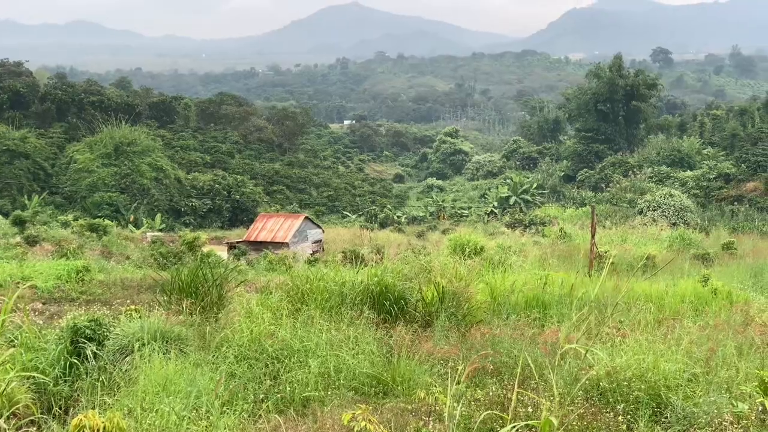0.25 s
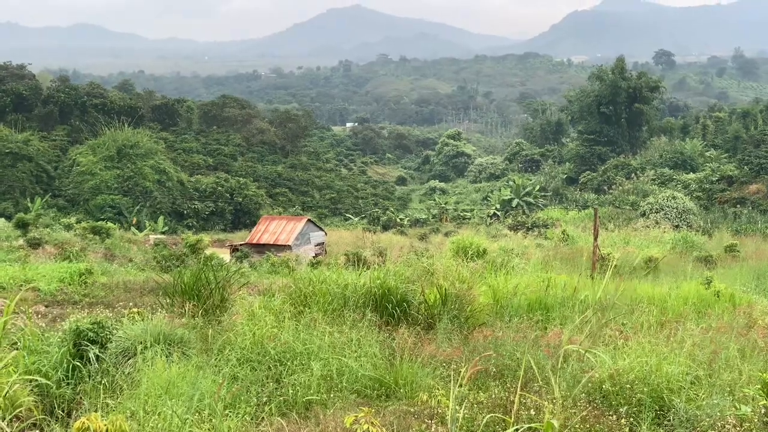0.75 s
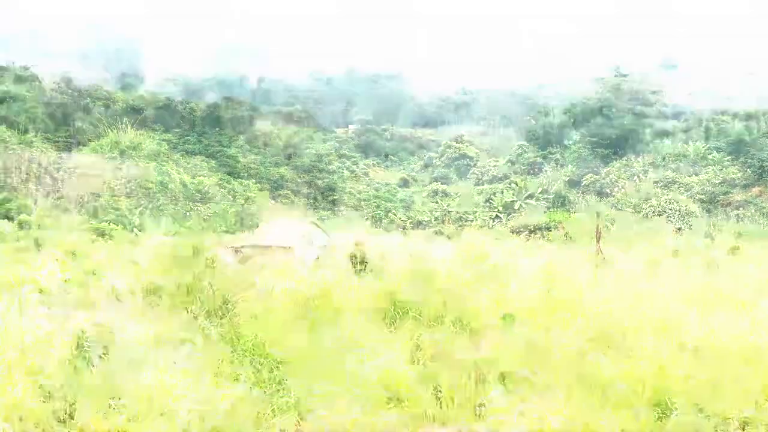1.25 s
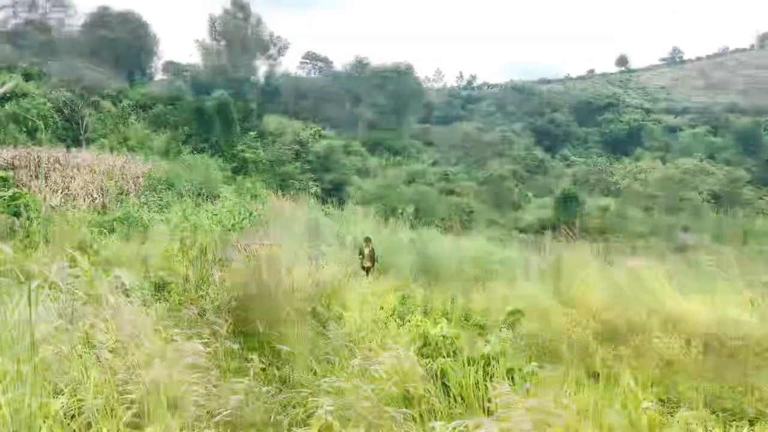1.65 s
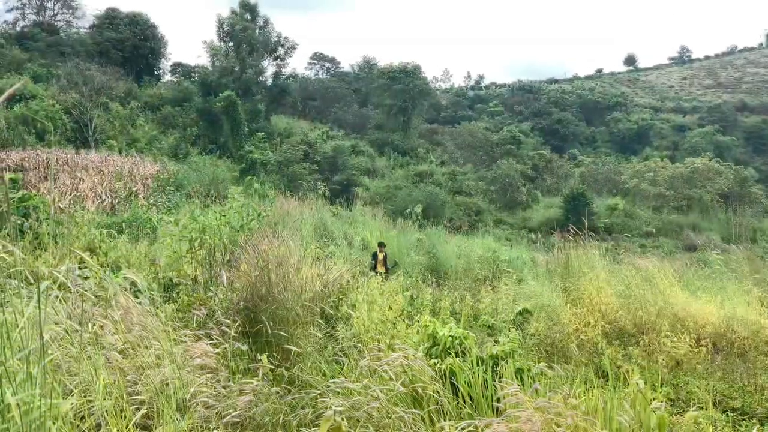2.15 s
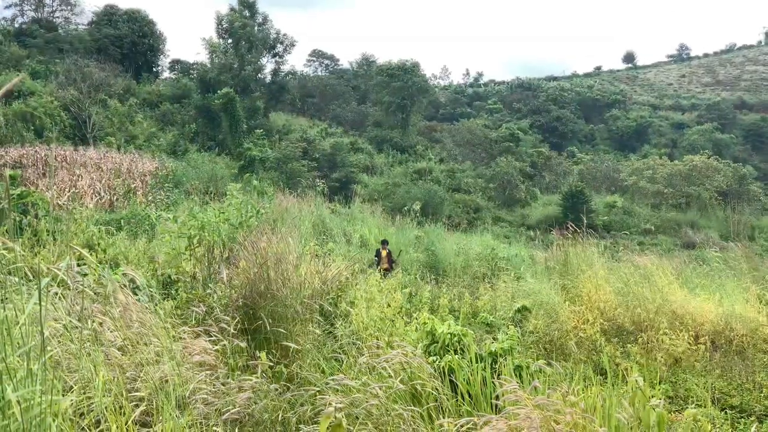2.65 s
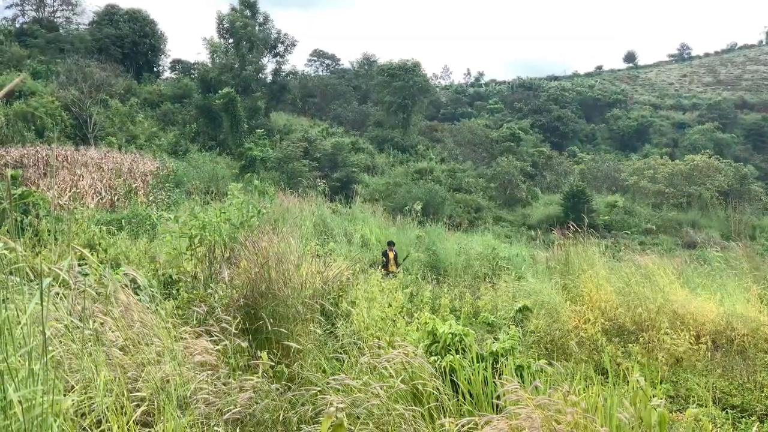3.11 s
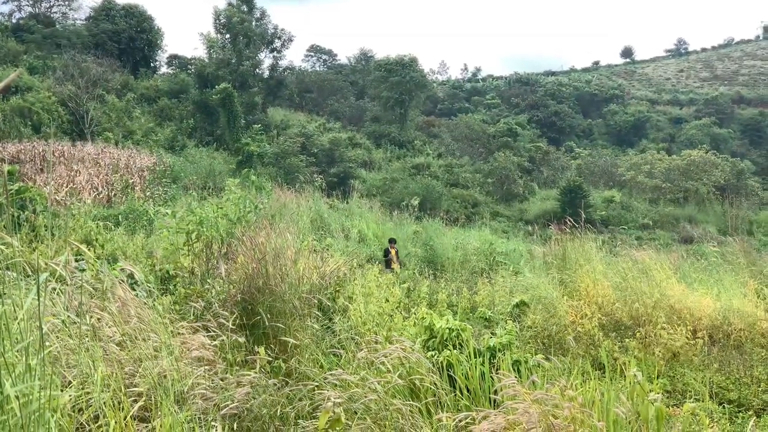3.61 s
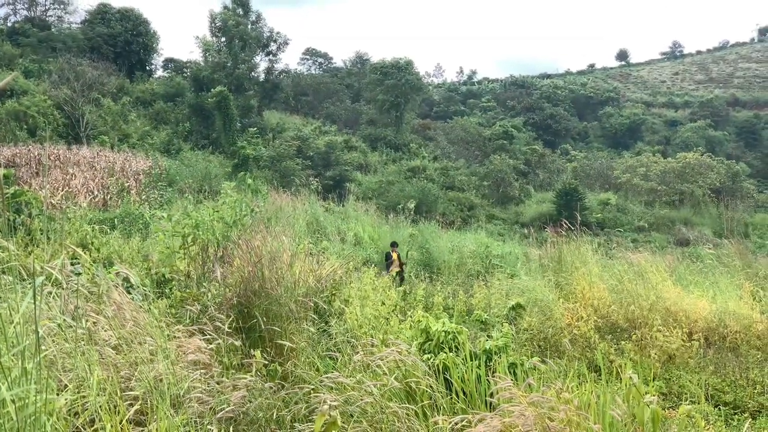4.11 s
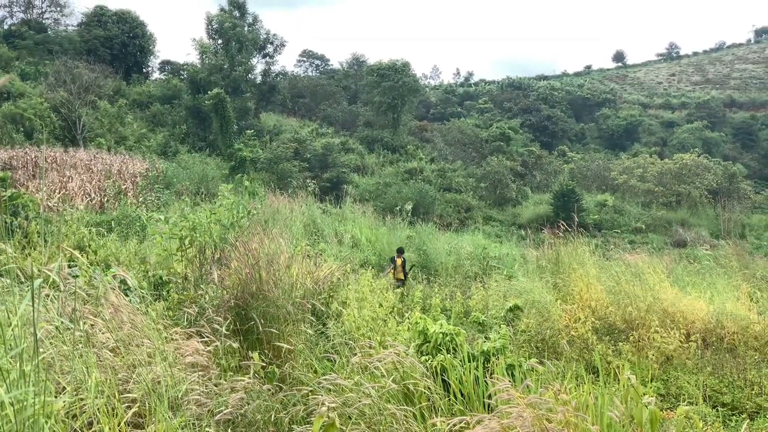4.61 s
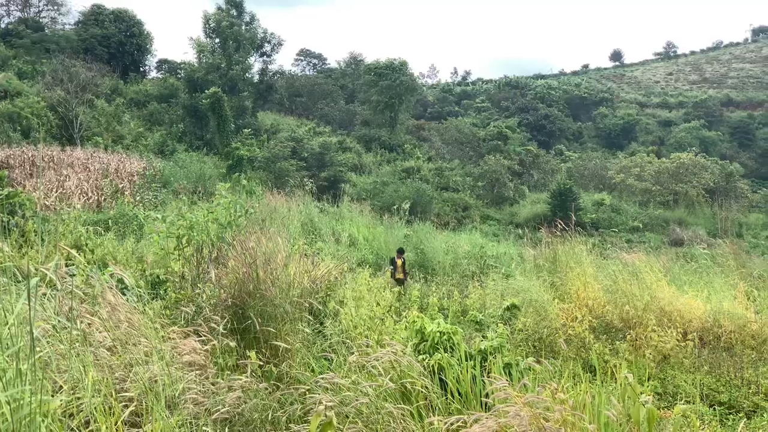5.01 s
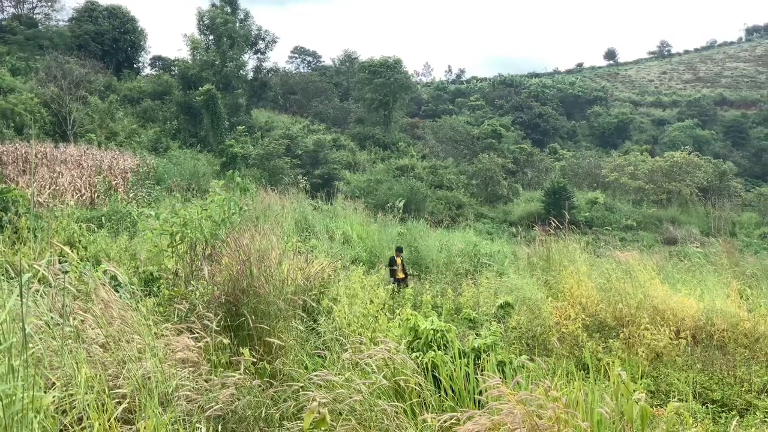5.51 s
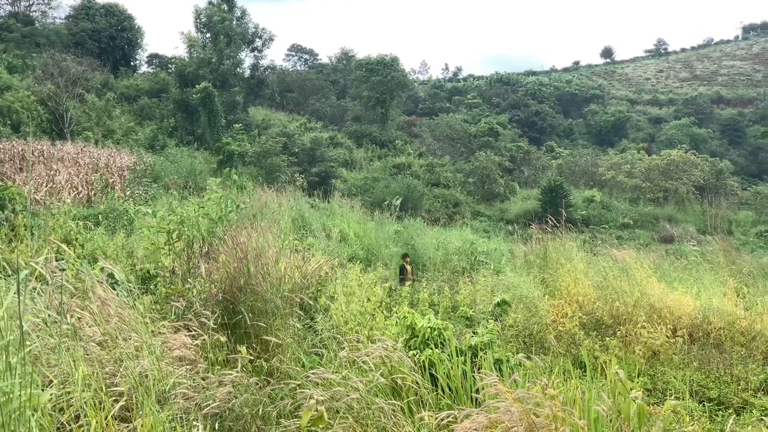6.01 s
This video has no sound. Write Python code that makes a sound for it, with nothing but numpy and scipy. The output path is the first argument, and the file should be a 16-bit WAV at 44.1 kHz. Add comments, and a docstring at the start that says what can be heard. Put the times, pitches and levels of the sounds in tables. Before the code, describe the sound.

A bright, narrow insect ringing near 6 kHz runs from start to end, with a thin bush-cricket sizzle higher up. From 0 to 1.8 s it is buzzier, over soft air and a slow one-cylinder engine chugging far away, with dull rapid thumps and a low hum. At 0.8 s a second ambience joins: smoother chorus, a low wavering motor drone that swells and sinks, and crickets chirping in pairs over four times a second amid faint trills. Far birds drop short blurred notes at 1.0-1.9 s. From 2.1 to 2.65 s a bird gives four rising, increasingly raspy notes, then six quick upward flicks fading by 3.4 s. A low rush swells near 3.3 s. Dry grass ticks sporadically, clearest around 4.3 s. A thin whistle rises at 5.4 s; faint bird notes patter from 5.8 s to the end at about 6.3 s.

```python
"""Open grassland from two listening spots

A chorus of insects rings near 6 kHz throughout: pulsed wing noise in a narrow band. Bush-crickets sizzle above it.
At the first spot a slow one-cylinder engine chugs far off: regular blows on damped resonances.
At the second, which overlaps it for a second, a distant motor drones as a wavering tone and crickets chirp and trill.
A bird gives one run of rising many-stranded notes, far birds call in gliding tones, and dry grass ticks in noise bursts.
"""
import sys
import numpy as np
from scipy import signal
from scipy.fft import rfft, irfft, next_fast_len
from scipy.io import wavfile
from scipy.ndimage import uniform_filter1d

SR = 44100
rng = np.random.default_rng(int(sys.argv[2]) if len(sys.argv) > 2 else 0)


def transcribe(signal):
    """Save signal, clipped to [-1, 1], as a 16-bit WAV file at the path in sys.argv[1]."""
    frames = np.atleast_2d(signal).T
    limited = np.clip(frames, -1, 1)
    pcm = np.round(limited * 32767).astype(np.int16)
    wavfile.write(sys.argv[1], SR, pcm)


N = 276066
TIME = np.arange(N) / SR
FFT_SIZE = next_fast_len(N, real=True)
BIN_HZ = np.maximum(np.arange(FFT_SIZE // 2 + 1) * SR / FFT_SIZE, 1e-3)  # above 0 so that its log exists

# Spectral outlines give relative density; the sounds shaped by them are scaled to rms 1 before they are mixed.
# wing resonance of the chorus at each spot: frequency_hz, density_db_per_hz
FIRST_SONG = [(5100, -29), (5600, -8.5), (5950, -1.5), (6100, -9), (6210, 5.5), (6400, -12), (6750, -21),
              (7100, -24.5)]
SECOND_SONG = [(5200, -42), (5700, -11), (5950, -2.5), (6080, -0.5), (6190, 5), (6330, -1), (6550, -8),
               (7050, -10.5), (7550, -27.5), (8100, -15.5), (9000, -66)]
# wing rasp of the bush-crickets: frequency_hz, density_db_per_hz
SIZZLE = [(12100, -76), (13000, 10), (14200, 6.5), (15000, 3.5), (15700, 7)]

# level of each cricket before panning: time_s, level_db
CHIRP_LEVEL = [(.8, -72), (2, -70), (4.5, -69), (5.2, -72.5), (6.26, -70.5)]
LOW_TRILL_LEVEL = [(.8, -84), (2, -83), (4, -80.5), (6.26, -80)]
HIGH_TRILL_LEVEL = [(.8, -85), (4.2, -84), (4.8, -87), (6.26, -88)]
# spurts in the trill of the lower cricket: centre_s
SPURTS = [1.22, 1.28, 1.38, 1.67, 1.87, 1.98, 2.73, 2.87, 3.03, 3.12, 3.25, 3.34, 3.45, 3.59, 3.77, 3.83,
          3.94, 4.2, 4.3, 4.4, 4.53, 4.62, 4.76, 4.85, 4.91, 5.02, 5.09, 5.18, 5.27, 5.4, 5.51, 5.86, 5.99,
          6.22]
CHIRPS_PER_S, FIRST_CHIRP_S = 4.577, .932  # each chirp is a pair of syllables
SYLLABLE_GAP_S, SYLLABLE_S = .056, .048
# half length of a spurt; strength of the trill between spurts
SPURT_S, TRILL_BETWEEN = .022, .55

# exhaust resonances of the one-cylinder engine: frequency_hz, decay_s, relative_level_db
EXHAUST_MODES = [(69, .022, -4), (122, .012, -5), (168, .015, 0)]
# resonances of the driven machine, struck by each knock: frequency_hz, decay_s, relative_level_db
CLATTER_MODES = [(264, .012, -6), (292, .012, -2), (319, .013, -1), (346, .012, 0)]
# mean levels of the machine's hum before its fade: harmonic_order, amplitude_db
HUM = [(3, -71), (6, -75), (7, -80), (8, -83), (9, -84)]
# fade of the driven machine: time_s, gain_db
MACHINE_FADE = [(.8, 0), (1.8, -5)]
FIRING_HZ, KNOCK_HZ, FIRST_BLOW_S, HUM_HZ = 13.87, 29.1, .027, 97.2
THUMP_DB, CLATTER_DB = -61.5, -64.5

# pitch of the distant motor, on average: time_s, firing_rate_hz
MOTOR_PITCH = [(.8, 62.33), (3.3, 65.52), (4.2, 67.1), (5, 68.03), (6, 68.77), (6.26, 66.5)]
# drone before flutter and mix: time_s, level_db
MOTOR_LEVEL = [(0.8, -57), (0.83, -42), (1.83, -55), (1.86, -43), (1.94, -72), (2.21, -50), (2.27, -94),
               (2.37, -48), (2.44, -55.5), (3.29, -50.5), (3.34, -41.5), (4.27, -40), (4.86, -52),
               (5.33, -40), (6.05, -40.5), (6.26, -59)]
# flutter at the strongest level (dB), and its growth for every dB that the drone sinks
FLUTTER_DB, FLUTTER_PER_DB = 2.43, 0.2712
# far rush that comes with the motor: frequency_hz, density_db_per_hz
RUSH = [(200, -4), (300, -6.5), (400, 2), (520, 0), (640, -4.5), (760, -13), (1000, -5), (1400, -42)]
# rush before flicker and mix: time_s, level_db
RUSH_LEVEL = [(0.8, -76), (0.83, -72.5), (1.88, -68), (1.89, -75.5), (3.54, -66.5), (3.67, -72),
              (3.77, -65), (4.08, -67), (4.4, -68.5), (4.78, -75.5), (4.98, -68), (5.54, -65.5),
              (5.67, -72), (5.91, -66.5), (6.26, -71.5)]

# drawn-out bird notes, levels before the mix, strands relative to the main one before the throat:
# start_s, length_s, start_hz, rise_hz, time_power, level_db, upper_strand_db, lower_strand_db, lower_voice_db
SLURS = [(2.14, 0.12, 3390, 377, 2.5, -64.5, -6, -17, -17),
         (2.28, 0.11, 3245, 600, 1.06, -62.5, -9, -8, -11),
         (2.421, 0.095, 3040, 1130, 1.1, -61, -1.5, -12, -6),
         (2.565, 0.083, 3035, 2180, 1.07, -60.5, -5, -11, -0.5)]
# short upward flicks, levels before the mix: start_s, length_s, top_hz, level_db
FLICKS = [(2.732, 0.061, 3403, -56), (2.887, 0.042, 3497, -55.5), (3.013, 0.032, 3400, -60),
          (3.123, 0.03, 3285, -62.5), (3.23, 0.029, 3260, -64), (3.337, 0.03, 3140, -66)]
# pitch over that of the main strand: upper_strand_ratio, lower_strand_ratio, lower_voice_ratio
STRAND_RATIOS = (1.16, .87, .59)
# the same strands in a flick, before the throat: upper_strand_db, lower_strand_db, lower_voice_db
FLICK_STRANDS_DB = (-26, -12, -28)
# air through the throat in the drawn-out notes: frequency_hz, density_db_per_hz
BIRD_HISS = [(1800, -8), (2100, -3), (2700, -12), (3300, -2), (4100, 0), (4600, -4), (5200, -6)]
BIRD_HISS_DB = -7.5  # relative to the notes
FLICK_START_HZ, FLICK_CREST = 1700, .8  # a flick arches to its top at this share of its length
SLUR_RASP, FLICK_RASP, WAVER_HZ = 0.95, 0.6, 380  # greatest roughness; pitch waver at roughness 1
THROAT_HZ, THROAT_WIDTH_HZ = 3650, 1800
SLUR_SWELL_DB, FLICK_SWELL_DB = 2, 8  # growth from start to end of a note
NOTE_ROUNDING = .45  # power of the arch that fades each note in and out

# short falling notes of far birds, before blurring: start_s, middle_hz, peak_db
FAR_NOTES = [(1.045, 2050, -70), (1.24, 2090, -72), (1.325, 2220, -70), (1.436, 2080, -70),
             (1.511, 1980, -68), (1.644, 2100, -67), (1.745, 2030, -68), (1.83, 2060, -71.5),
             (5.764, 2800, -88), (5.835, 2780, -77), (5.905, 2790, -72), (5.975, 2830, -73),
             (6.04, 2780, -76), (6.105, 2810, -74), (6.175, 2740, -75)]
FAR_NOTE_S, FAR_FALL_HZ = .045, 170
# thin rising whistle, before blurring: start_s, length_s, start_hz, rise_hz, peak_db
WHISTLE = (5.372, .135, 4030, 1330, -77)

# dry grass, before the mix: peak_s, decay_s, level_db
TICKS = [(1.653, 0.044, -74), (2.735, 0.083, -70), (3.245, 0.0044, -66), (3.333, 0.0032, -70),
         (3.485, 0.024, -73), (3.777, 0.013, -73), (4.068, 0.05, -75), (4.291, 0.067, -66),
         (4.347, 0.072, -70), (5.852, 0.008, -66.5)]
# ring of a dry stalk: frequency_hz, density_db_per_hz
STALK = [(800, -25), (2000, 4), (4000, 20), (6000, 11.5), (10000, 18), (14000, -34)]

# low rush that swells between 2.2 and 4.2 s: frequency_hz, density_db_per_hz
LOW_RUSH = [(170, 3), (230, -1.5), (290, -0.5), (340, -4)]
# low rush: time_s, mid_level_db
LOW_RUSH_LEVEL = [(2.2, -88), (2.8, -71.5), (3.3, -66), (3.7, -78), (4.2, -92)]
# air over each spot: frequency_hz, density_db_per_hz
FIRST_AIR = [(25, -29), (50, 1.5), (100, 3.5), (180, -3), (400, -15.5), (500, -15.5), (620, -20),
             (1000, -25.5), (2000, -28.5), (5000, -30), (7300, -51), (8200, -51), (10500, -36),
             (11500, -61)]
SECOND_AIR = [(22, -21), (45, -1.5), (80, 4), (125, -8.5), (160, -10), (215, -22.5), (290, -15.5),
              (400, -28), (750, -33), (1000, -29), (1500, -33.5), (2100, -34), (3000, -42.5), (5000, -45),
              (8900, -60.5), (10500, -41), (11500, -70.5)]
# how far the channels differ for sound from all around: frequency_hz, side_minus_mid_db
WIDTH = [(60, -14.5), (200, -12), (400, -9), (1200, -2.5), (2400, -1), (8000, 0.5), (14000, -12)]

FIRST_ENDS_S, SECOND_STARTS_S = 1.8, .8
TOP_HZ = 15750


def chorus(song, stroke_hz, stroke_power, crowd_db, left_db):
    """Stridulation: strokes pulse a near insect's wing resonance; the crowd's many strokes blur into one tone."""
    near = colour(rng.standard_normal(N), song) * strokes(stroke_hz, 0.04, stroke_power)
    crowd = all_around(song) * undb(.5 * walk(34))
    return pan(unit(near + undb(crowd_db) * crowd), left_db)


def crickets():
    """Amplitude gating: one cricket chirps in paired syllables, a low one trills in spurts, a high one evenly."""
    count = (TIME - FIRST_CHIRP_S) * CHIRPS_PER_S
    from_chirp_s = np.abs(count - np.round(count)) / CHIRPS_PER_S
    from_syllable_s = from_chirp_s - SYLLABLE_GAP_S / 2
    chirps = .2 + np.exp(-(2 * from_syllable_s / SYLLABLE_S) ** 4)
    spurts = TRILL_BETWEEN + sum(np.exp(-((TIME - s) / SPURT_S) ** 2) for s in SPURTS)

    chirper = cricket(7205, 60, 51, chirps * undb(2 * walk(63)), lead=2.8, wet_db=-7.5)
    low = cricket(4007, 13, 41, spurts * undb(2.5 * walk(45)), lead=0.43, wet_db=-3)
    high = cricket(7884, 45, 66, undb(2 * walk(38)), lead=-.6, wet_db=3.5)

    chirper = pan(undb(curve(CHIRP_LEVEL)) * chirper, -4.0)
    low = pan(undb(curve(LOW_TRILL_LEVEL)) * low, -0.3)
    high = pan(undb(curve(HIGH_TRILL_LEVEL)) * high, -0.59)
    return chirper + low + high


def cricket(hz, wander_hz, stroke_hz, gate, lead, wet_db):
    """Modulated carrier: strokes pulse a nearly pure wing tone; grass blurs it; left leads by lead radians."""
    phase = 2 * np.pi * turns(hz + wander_hz * walk(112))
    pulses = strokes(stroke_hz, .08, .8) * gate
    tone = np.sin([phase + lead, phase])
    return unit(scatter(tone * pulses, t60=.05, wet_db=wet_db))


def bush_crickets():
    """Pulsed broadband stridulation: a slow and a fast rasp near the top of hearing, wide between the channels."""
    slow = strokes(16.5, .06, 2.1) * colour(rng.standard_normal(N), SIZZLE)
    fast = strokes(40.0, 0.014, 1.4) * colour(rng.standard_normal(N), SIZZLE)
    rasps = slow + fast
    stereo = np.stack([rasps, np.roll(rasps, 2)])  # right copy delayed two samples for width
    return unit(stereo + undb(-4) * all_around(SIZZLE)) * undb(1.4 * walk(16))


def strokes(rate_hz, jitter, power):
    """Periodic excitation: one smooth swell for each wing stroke, at a slightly unsteady rate."""
    cycles = turns(rate_hz * (1 + jitter * walk(14.0)))
    return unit(np.abs(np.sin(np.pi * cycles)) ** power)


def chugging_engine():
    """Impulse response: firings thump the exhaust; the driven machine knocks at its own rate, hums and fades."""
    thumps = knocks(EXHAUST_MODES, FIRING_HZ, uneven_db=1.5)
    clatter = knocks(CLATTER_MODES, KNOCK_HZ, uneven_db=1.2)
    phase = 2 * np.pi * turns(HUM_HZ * (1 + 0.003 * walk(6)))
    hum = sum(undb(db + 2.5 * walk(9)) * np.sin(order * phase) for order, db in HUM)
    fade = undb(curve(MACHINE_FADE))
    return undb(THUMP_DB) * thumps + fade * (undb(CLATTER_DB) * clatter + hum)


def knocks(modes, rate_hz, uneven_db):
    """Modal ringing: regular blows, uneven in strength, excite a set of damped resonances."""
    times = np.arange(FIRST_BLOW_S, TIME[-1], 1 / rate_hz)
    blows = np.zeros(N)
    blows[(times * SR).astype(int)] = undb(uneven_db * rng.standard_normal(len(times)))
    t = TIME[:SR // 4]
    ring = sum(undb(db) * np.sin(2 * np.pi * hz * t) * np.exp(-t / decay) for hz, decay, db in modes)
    ring = signal.sosfilt(signal.butter(6, 365, fs=SR, output="sos"), ring)  # low-pass at 365 Hz
    onset = 1 - np.exp(-t / .004)
    return unit(signal.oaconvolve(blows, ring * onset)[:N])


def droning_motor():
    """Low harmonics: the firing note and a trace of its octave waver, with a rush that swells and fades."""
    phase = 2 * np.pi * turns(curve(MOTOR_PITCH) + 1.42 * walk(25.8))
    note = unit(np.sin(phase) + undb(-27.5) * np.sin(2 * phase))
    level_db = curve(MOTOR_LEVEL)
    # the drone flutters more as it sinks
    flutter_db = (FLUTTER_DB + FLUTTER_PER_DB * (level_db.max() - level_db)) * walk(25)
    drone = pan(note * undb(level_db + flutter_db), -2.4)
    flicker_db = 1.8 * walk(30)
    rush = all_around(RUSH) * undb(curve(RUSH_LEVEL) + flicker_db)
    return undb(-2.5) * drone + undb(-1.5) * rush


def bird():
    """Frequency modulation: many-stranded notes rise into a rasp; then come quick upward flicks that fade."""
    voice = np.zeros(N)
    for s, length, start, rise, bend, db, *strands_db in SLURS:
        def slur(u):
            return start + rise * u ** bend

        def growing_rasp(u):
            return SLUR_RASP * u ** 1.5

        voice += undb(db) * bird_note(s, length, slur, growing_rasp, strands_db, SLUR_SWELL_DB)

    # the hiss of breath follows the running rms of the drawn-out notes
    effort = np.sqrt(np.abs(uniform_filter1d(voice ** 2, size=900)))
    hiss = undb(BIRD_HISS_DB) * effort * colour(rng.standard_normal((2, N)), BIRD_HISS)

    for s, length, top, db in FLICKS:
        def arch(u):
            return top - (top - FLICK_START_HZ) * (1 - u / FLICK_CREST) ** 2

        def easing_rasp(u):
            return FLICK_RASP * (1 - u)

        voice += undb(db) * bird_note(s, length, arch, easing_rasp, FLICK_STRANDS_DB, FLICK_SWELL_DB)

    stereo = np.stack([np.roll(voice, -3), voice]) + hiss  # left copy three samples ahead
    # leaves close by blur each note; the bushes further off add a longer tail
    blurred = scatter(stereo, t60=.026, wet_db=-2)
    return undb(-1) * pan(scatter(blurred, t60=.4, wet_db=-7.5), -.5)


def bird_note(s, length, pitch, roughness, strands_db, swell_db):
    """Multiple voices: strands glide together, waver apart and swell; u is the elapsed share of the note."""
    span = (TIME >= s) & (TIME < s + length)
    u = (TIME[span] - s) / length
    note = 0
    for ratio, db in zip((1, *STRAND_RATIOS), (0, *strands_db)):
        waver = unit(uniform_filter1d(rng.standard_normal(len(u)), size=50))
        hz = ratio * pitch(u)
        growth = 1 if ratio >= 1 else np.sqrt(2) * u  # what lies below the main strand comes in late
        strand = np.sin(2 * np.pi * turns(hz + roughness(u) * WAVER_HZ * waver))
        note = note + undb(db) * growth * throat(hz) * strand
    arch = np.sin(np.pi * u) ** NOTE_ROUNDING
    swell = arch * undb(swell_db * u + 2 * walk(300)[span])
    out = np.zeros(N)
    out[span] = unit(note * swell)
    return out


def throat(hz):
    """Resonance: a voice of the bird is loudest where it crosses the resonance of the throat."""
    return 1 / np.hypot(1, 2 * (hz - THROAT_HZ) / THROAT_WIDTH_HZ)


def far_birds():
    """Diffuse scattering: trees smear the short notes of two far birds and the single whistle of a third."""
    notes, waver = np.zeros(N), walk(309)
    for s, hz, db in FAR_NOTES:
        notes += undb(db) * glide_note(s, FAR_NOTE_S, hz + FAR_FALL_HZ / 2, -FAR_FALL_HZ, 170 * waver)
    s, length, start, rise, db = WHISTLE
    whistle = undb(db) * glide_note(s, length, start, rise, 70 * waver)
    return scatter(notes, t60=.15, wet_db=2) + scatter(whistle, t60=.06, wet_db=-3)


def glide_note(s, length, start_hz, rise_hz, waver_hz):
    """Linear glide: a thin wavering tone slides straight in pitch and fades in and out."""
    u = np.clip((TIME - s) / length, 0, 1)
    fade = np.sqrt(4 * u * (1 - u))
    return fade * np.sin(2 * np.pi * turns(start_hz + rise_hz * u + waver_hz))


def grass():
    """Friction noise: dry stalks rub in grainy crackles; longer ones build and die away more slowly."""
    attack_share, grain_db = .25, 4  # build-up time over decay time; spread of the grain
    swell = np.zeros(N)
    for s, length, db in TICKS:
        decays_away = np.maximum((TIME - s) / length, (s - TIME) / (attack_share * length))
        swell += undb(db) * np.exp(-decays_away)
    crackle = colour(rng.standard_normal(N) * undb(grain_db * walk(400)), STALK)
    return undb(-2.0) * scatter(crackle * swell, t60=0.037, wet_db=-3)


def first_spot():
    """Superposition: buzzing chorus, bush-crickets, chugging engine and soft air."""
    insects = undb(-63.5) * chorus(FIRST_SONG, stroke_hz=52.5, stroke_power=0.44, crowd_db=-2.5, left_db=-2.0)
    air = undb(-59.0) * all_around(FIRST_AIR)
    return insects + undb(-76.0) * bush_crickets() + chugging_engine() + air


def second_spot():
    """Superposition: smoother chorus, crickets, bush-crickets, motor and a low rush over slightly flickering air."""
    insects = undb(-66.0) * chorus(SECOND_SONG, stroke_hz=71.8, stroke_power=0.39, crowd_db=-1.0, left_db=-2.0)
    sizzle = undb(-69.5) * bush_crickets()
    low_rush = all_around(LOW_RUSH) * undb(curve(LOW_RUSH_LEVEL))
    air = undb(-54.0) * all_around(SECOND_AIR) * undb(1.68 * walk(41))
    return insects + crickets() + sizzle + droning_motor() + low_rush + air


def all_around(points):
    """Diffuse field: noise from every direction; long waves reach both channels alike, short ones differ."""
    hz, side_db = np.transpose(WIDTH)
    mid, side = colour(rng.standard_normal((2, N)), points)
    side_gain = undb(np.interp(np.log(BIN_HZ), np.log(hz), side_db))
    side = irfft(rfft(side, FFT_SIZE) * side_gain, FFT_SIZE)[:N]
    return mid + side * np.array([[1], [-1]])


def scatter(x, t60, wet_db):
    """Diffuse reverberation: an exponential noise tail, different in each channel; t60 is its 60 dB decay in s."""
    t = TIME[:SR // 2]
    tail = rng.standard_normal((2, len(t))) * np.exp(-np.log(1000) * t / t60)
    tail /= np.sqrt(np.sum(tail ** 2, axis=1, keepdims=True))
    wet = signal.fftconvolve(np.atleast_2d(x), tail, axes=1)[:, :N]
    return (x + undb(wet_db) * wet) / np.hypot(1, undb(wet_db))


def pan(x, left_db):
    """Interaural level difference: place a sound by its left minus right level."""
    return x * undb(np.array([[left_db], [-left_db]]) / 2)


def colour(x, points):
    """Spectral shaping: filter by a (Hz, dB) outline that falls away steeply beyond its ends; rms 1."""
    hz, db = np.transpose(points)
    outside = np.abs(np.log(BIN_HZ / np.clip(BIN_HZ, hz[0], hz[-1])))
    gain = undb(np.interp(np.log(BIN_HZ), np.log(hz), db) - 60 * outside)
    return unit(irfft(rfft(x, FFT_SIZE) * gain, FFT_SIZE)[..., :N])


def walk(rate):
    """Low-pass noise: a smooth random curve that changes about rate times a second; rms 1."""
    gain = 1 / (1 + (2 * BIN_HZ / rate) ** 4)
    return unit(irfft(rfft(rng.standard_normal(FFT_SIZE)) * gain, FFT_SIZE)[:N])


def turns(hz):
    """Phase as the integral of frequency: cycles done so far, from a random start."""
    return np.cumsum(hz) / SR + rng.random()


def curve(rows):
    """Linear interpolation: join (s, value) rows by straight lines."""
    return np.interp(TIME, *np.transpose(rows))


def unit(x):
    """Normalisation: scale to rms 1."""
    return x / np.sqrt(np.mean(x ** 2))


def undb(db):
    """Logarithmic level: decibels to amplitude gain."""
    return 10 ** (np.asarray(db) / 20)


def scene():
    """Superposition in time: the second spot cuts in before the first cuts out; birds and grass lie over both."""
    cut_s = 0.01
    first = np.clip((FIRST_ENDS_S - TIME) / cut_s, 0, 1)
    second = np.clip((TIME - SECOND_STARTS_S) / cut_s, 0, 1)
    return first * first_spot() + second * second_spot() + bird() + far_birds() + grass()


def record(dry):
    """Band limiting: a steep elliptic low-pass cuts the top of the spectrum."""
    return signal.sosfilt(signal.ellip(10, .2, 80, TOP_HZ, fs=SR, output="sos"), dry)


dry = scene()
out = record(dry)
transcribe(out)
```